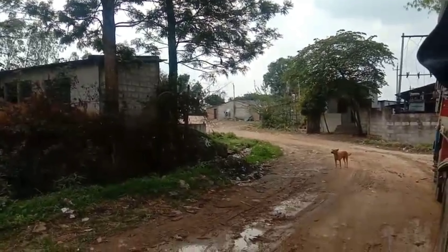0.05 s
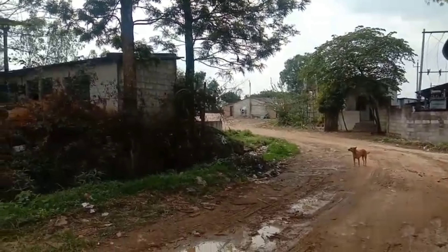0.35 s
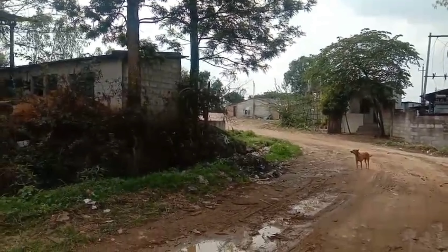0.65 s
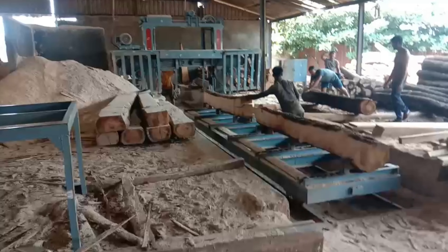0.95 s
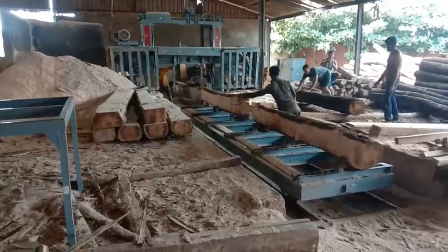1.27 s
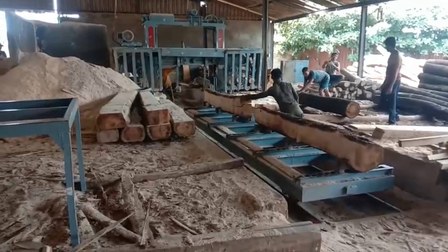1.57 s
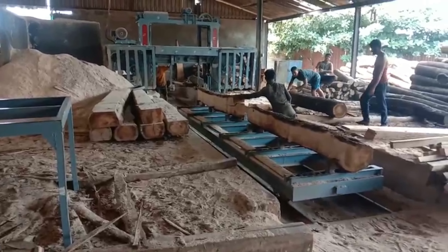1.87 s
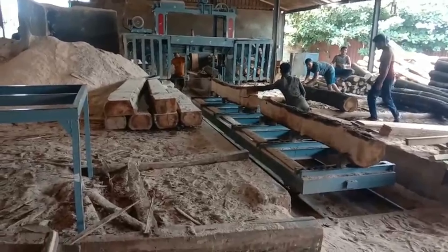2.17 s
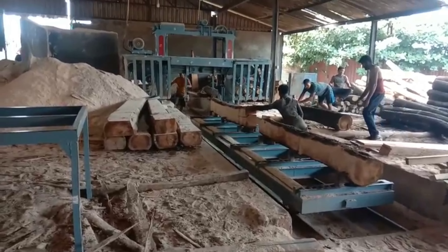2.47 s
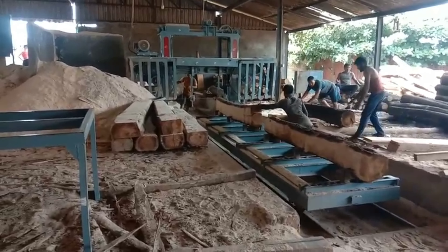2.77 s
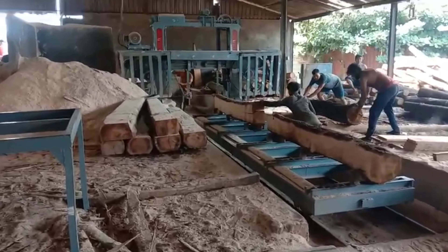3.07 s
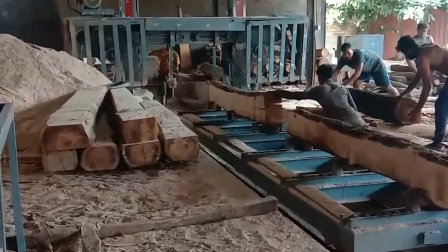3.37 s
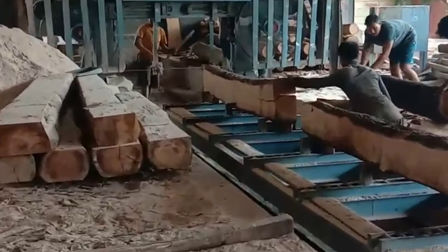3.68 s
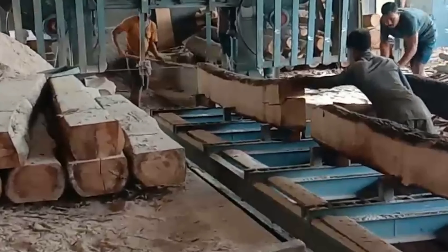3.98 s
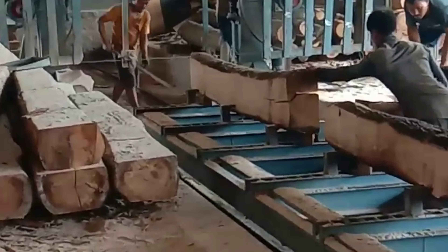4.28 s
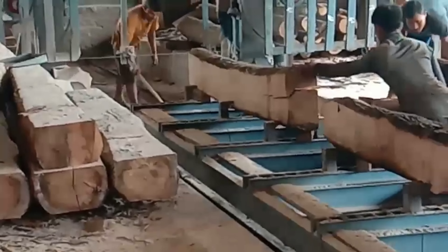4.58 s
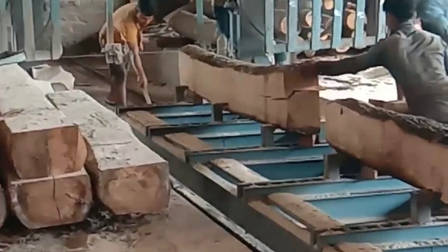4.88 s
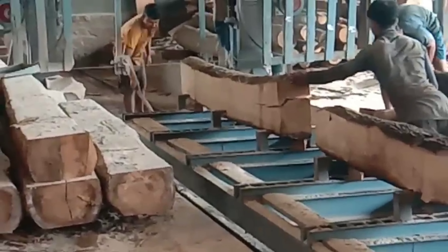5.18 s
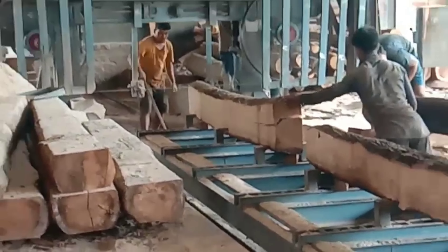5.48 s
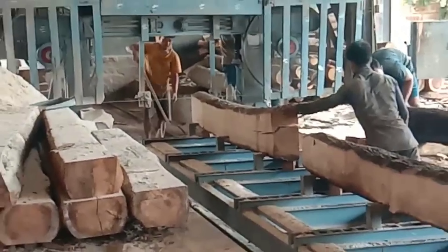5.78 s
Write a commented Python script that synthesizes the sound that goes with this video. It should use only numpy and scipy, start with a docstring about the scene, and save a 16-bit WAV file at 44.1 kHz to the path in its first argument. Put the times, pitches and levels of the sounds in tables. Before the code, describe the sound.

A short whistling blast of air and a clunk outdoors, then a band saw hisses and rings steadily through a log.

```python
"""On a village road a vehicle idles, bumps, vents a whistling jet of air and clunks; then the scene changes.
Under a tin roof a band saw fades in, ripping a log. Its teeth tear the fibres, so the kerf hisses and blade and
frame ring in forced vibration. The band sings between its wheels and chirps by friction in its guides, while
the carriage rumbles, timber knocks and the drive hums."""
import sys
import numpy as np
from scipy import signal
from scipy.fft import rfft, irfft
from scipy.io import wavfile

SR = 44100
rng = np.random.default_rng(int(sys.argv[2]) if len(sys.argv) > 2 else 0)


def waveform_to_disk(signal):
    """Save audio, clipped to [-1, 1], as 16-bit WAV at the path in sys.argv[1]."""
    frames = np.transpose(np.atleast_2d(signal))
    scaled = np.clip(frames, -1, 1) * 32767
    samples = np.round(scaled).astype(np.int16)
    wavfile.write(sys.argv[1], SR, samples)


N = 261954
TIME = np.arange(N) / SR
FREQ = np.fft.rfftfreq(N, 1 / SR)


def saw_teeth():
    """Forced vibration: teeth tearing uneven fibres make the kerf hiss, the frame ring, the log groan."""
    # Broad spectra of the kerf and of blade and frame: frequency_hz, level_db
    kerf_spectrum = [(2500, -33), (4000, -17.5), (5200, -8.5), (6300, -6), (6650, -6.5), (7500, -7),
                     (8000, -15.5), (9500, -21), (12000, -29.5), (13900, -24.5), (14700, -21),
                     (15500, -16.5)]
    frame_spectrum = [(250, -13), (550, -9.5), (850, -7.5), (1080, -1), (1480, -7), (1700, -2.5),
                      (2050, -4), (2650, 0), (3600, -5), (4800, -4), (7000, -12), (9000, -35.5)]
    # Resonances standing on those spectra: centre_hz, width_hz, height_db
    kerf_modes = [(5480, 290, 2.6), (6080, 650, 9.95), (7070, 370, 5.7), (11340, 710, 5.4), (14700, 160, 4)]
    frame_modes = [(1249, 93, 9.5), (2282, 163, 7.7), (3100, 36, 0.7), (3900, 67, 4.9), (4430, 60, 2.7),
                   (4540, 70, 5.7)]
    # Groan of the log as the blade enters: time_s, level_db
    entry_envelope = [(1.0, -29), (1.3, -30), (1.6, -26.5), (1.85, -29), (2.1, -37), (2.4, -42)]
    # Resonances of the log: centre_hz, half_width_hz, level_db
    log_modes = [(171.6, 20, 0), (326, 37, -0.5), (431, 38, -3.5), (790, 260, -2), (1262, 98, 0.5),
                 (2270, 90, -25)]
    bite = gain_of(np.tanh(wander(180)))  # single fibres roughen the sound
    grain_load = np.tanh(wander(14))  # hard and soft grain loads the teeth
    settling_s = [1.83, 2.38]  # deep in the log, the hiss grows and the frame calms
    hiss_db = np.interp(TIME, settling_s, [-21, -18]) + .72 * grain_load
    frame_db = np.interp(TIME, settling_s, [-23.5, -26]) + .92 * grain_load
    kerf = gain_of(hiss_db) * colour(white() * bite, kerf_spectrum, kerf_modes)
    frame = gain_of(frame_db) * colour(white() * bite, frame_spectrum, frame_modes)
    groan = level(entry_envelope) * resonate(white(), log_modes)
    return shed_echoes(kerf, t60_s=.3, wet_db=-16) + shed_echoes(frame + groan, t60_s=.45, wet_db=-11)


def blade_song():
    """Transverse vibration: the free span of the band sings at one pitch, swelling and sinking."""
    # Overall strength of the song: time_s, level_db
    envelope = [(1.3, -48.5), (2.15, -41), (2.35, -48.5), (2.85, -39), (3.0, -51), (3.8, -48), (4.9, -46),
                (5.35, -51), (5.94, -53)]
    swell_hz, crest_s = 3.29, 2.84
    swell_db = 3 * np.cos(2 * np.pi * swell_hz * (TIME - crest_s))
    swell_db += 4 * np.tanh(wander(2 * swell_hz))
    return level(envelope) * gain_of(swell_db) * tone(582.4, stray_hz=4, flutter_db=1, pace_hz=14)


def guide_chirps():
    """Stick-slip friction: the band chirps as it catches and slips in its guides."""
    # Rubs against the guides: centre_s, level_db, pitch_hz, half_length_s
    chirps = [(1.44, -24, 3350, .022), (1.89, -30, 3070, 0.05), (2.09, -28, 3080, .021),
              (2.32, -31, 3350, .025), (2.35, -32, 3160, .03), (2.53, -29.5, 3180, 0.027),
              (2.575, -26, 3380, 0.03), (2.75, -29, 3100, 0.021), (2.98, -30, 3070, 0.067),
              (3.405, -26.5, 3360, 0.037), (4.03, -30, 3290, 0.026), (4.48, -31, 3130, .022),
              (4.65, -33, 3090, .025), (4.855, -27.5, 3350, .022), (5.08, -26.5, 3080, 0.042),
              (5.485, -23.5, 3360, .02)]
    stick_slip = unit_rms(gain_of(3.4 * np.tanh(wander(90))))
    return stick_slip * bursts(chirps, stray_fraction=.009, pace_hz=150)


def carriage():
    """Rolling noise: the carriage runs unevenly, and its jolts modulate a low rumble."""
    # Strength of the rumble: time_s, level_db
    envelope = [(1.3, -43), (1.7, -39), (2.05, -36), (2.5, -39.5), (3.3, -40.5), (4.1, -40), (4.3, -39),
                (5.94, -40.5)]
    # Spectrum of the rumble: frequency_hz, level_db
    spectrum = [(25, -37), (50, -38), (75, -13), (105, 0), (165, 1), (250, -4.5), (340, -3), (440, -7.5),
                (600, -10.5), (1200, -44)]
    jolts = gain_of(2 * wander(11))
    return level(envelope) * jolts * colour(white(), spectrum)


def drive():
    """Rotating machinery: drive and wheels hum in a line spectrum whose higher tones stray further."""
    # Tones of the drive and wheels: pitch_hz, level_db
    tones = [(163, -47.5), (376.8, -52.5), (425.3, -49), (527.6, -58.5), (672.9, -57), (769.8, -56),
             (926, -55.5), (969, -58), (1049, -49.5), (1125, -44.5), (1243, -43.5), (1863, -51),
             (2342, -45), (5530, -35.5)]
    return sum(gain_of(db) * tone(hz, stray_hz=1.5 + .0025 * hz, flutter_db=3, pace_hz=16)
               for hz, db in tones)


def timber():
    """Impact and sliding friction: shifted timber knocks, and a plank scrapes at the carriage."""
    # Knocks of timber: centre_s, level_db, pitch_hz, half_length_s
    knocks = [(1.42, -33, 149.4, .03), (1.8, -34.5, 95, 0.022), (4.27, -33, 158, 0.032),
              (4.37, -31.5, 150, 0.021), (4.86, -33, 162, .03), (5.71, -35, 146.4, 0.022),
              (5.84, -36, 135, .027)]
    # Strength of the scrape: time_s, level_db
    scrape_envelope = [(5.82, -51), (5.845, -30), (5.88, -23.5), (5.94, -38)]
    # Resonances of the plank: centre_hz, half_width_hz, level_db
    plank_modes = [(239, 79, -2), (945, 240, -2), (1440, 200, 7), (1840, 260, 6.5), (2780, 180, 3)]
    knocking = bursts(knocks, stray_fraction=.15, pace_hz=58.8)
    return knocking + level(scrape_envelope) * resonate(white(), plank_modes)


def air_valve():
    """Flow-excited resonance: a jet of compressed air drives the valve's modes until they whistle."""
    # Strength of the flow and of the whistling: time_s, level_db
    flow_envelope = [(.74, -70), (.768, -41), (.785, -29), (.803, -25), (.812, -19), (.825, -24.5),
                     (.85, -23), (.93, -23), (.98, -22.5)]
    whistle_envelope = [(.76, -40), (.80, -6), (.835, -6), (.85, 0), (.915, 1), (.94, -3), (.98, -6)]
    # Spectrum of the jet: frequency_hz, level_db
    jet_spectrum = [(150, -36), (500, -16), (800, -7.5), (1400, -12), (1900, -7.5), (3700, -11),
                    (4900, -4.5), (6200, -0.5), (6600, -3), (7400, -4), (8500, -14.5), (11000, -23.5),
                    (13700, -29), (15200, -21)]
    # Whistling modes of the valve: pitch_hz, level_db
    valve_tones = [(3240, -42), (4285, -31), (4926, -33), (5373, -38), (5582, -30.5), (6035, -37),
                   (6234, -29.5), (6724, -38), (6864, -33.5), (7472, -39)]
    cavity_modes = [(hz, 110, 6) for hz, _ in valve_tones]
    jet = level(flow_envelope) * colour(white(), jet_spectrum, cavity_modes)
    whistles = sum(gain_of(db) * tone(hz, stray_hz=13, flutter_db=3, pace_hz=70)
                   for hz, db in valve_tones)
    return jet + level(whistle_envelope) * whistles


def panel_clunk():
    """Modal response: a brief force sounds the resonances of a panel as a clunk."""
    # Force on the panel: time_s, level_db
    force_envelope = [(.93, -67), (.943, -30), (.952, -19.5), (.962, -21.5), (.968, -18.5), (.98, -32)]
    # Resonances of the panel: centre_hz, half_width_hz, level_db
    panel_modes = [(335, 35, -8.5), (730, 200, 1.5), (1245, 96, 3), (1800, 140, -4)]
    return level(force_envelope) * resonate(white(), panel_modes)


def roadside():
    """Superposition: broadband outdoor noise, the faint tones of an idling vehicle and its soft bumps."""
    # Spectrum of the outdoor wash: frequency_hz, level_db
    wash_spectrum = [(25, -34), (70, -14), (130, -3.5), (230, -14.5), (700, -9.5), (1200, -8),
                     (1550, -14.5), (2700, -6), (3600, -14.5), (5100, -15), (5900, -9), (7300, -12.5),
                     (9000, -31.5), (13000, -44)]
    # Peaks and a dip in the wash: centre_hz, width_hz, height_db
    wash_peaks = [(1260, 100, 5), (2190, 160, 5), (2770, 540, 7), (6620, 260, -6)]
    # Steady tones of the idle: pitch_hz, level_db
    idle_tones = [(355.3, -52.5), (1249, -53.5), (2826, -52)]
    # Bumps of the bodywork: centre_s, level_db, pitch_hz, half_length_s
    bumps = [(.345, -34, 119.6, 0.0086), (.409, -29, 125, 0.0044), (.432, -19.5, 85.4, 0.0061),
             (.468, -38, 79.3, .014)]
    wash = gain_of(-35.5) * colour(white(), wash_spectrum, wash_peaks) * gain_of(.5 * wander(25))
    idle = sum(gain_of(db) * tone(hz, stray_hz=5, flutter_db=2.5, pace_hz=18) for hz, db in idle_tones)
    return wash + idle + bursts(bumps, stray_fraction=.078, pace_hz=40)


def shed_echoes(x, t60_s, wet_db):
    """Reverberation: reflections scattered by the roof and timber stacks decay exponentially."""
    delay_s, echoes_per_s = TIME[:SR // 2], 2000
    strengths = rng.standard_normal(len(delay_s))
    arrivals = (rng.random(len(delay_s)) < echoes_per_s / SR) * (delay_s > .004)
    taps = strengths * arrivals * gain_of(-60 * delay_s / t60_s)
    echoes = signal.fftconvolve(x, taps / np.linalg.norm(taps))[:N]
    return (x + gain_of(wet_db) * echoes) / np.hypot(1, gain_of(wet_db))


def colour(x, spectrum, peaks=()):
    """Spectral shaping: filters x by a broad curve with bell-shaped peaks or dips, to rms 1."""
    hz, db = np.transpose(spectrum)
    shape_db = np.interp(np.log(FREQ + 1), np.log(hz), db)
    for centre_hz, width_hz, height_db in peaks:
        shape_db += height_db * 2 ** -((2 * (FREQ - centre_hz) / width_hz) ** 2)
    return unit_rms(irfft(rfft(x) * gain_of(shape_db), N))


def resonate(x, modes):
    """Modal summation: x passes through steep resonances, each with its own share of the power."""
    spectrum, response = rfft(x), np.zeros(N)
    for hz, half_width_hz, db in modes:
        mode = irfft(spectrum / (1 + 1j * (FREQ - hz) / half_width_hz) ** 2, N)
        response += gain_of(db) * unit_rms(mode)
    return unit_rms(response)


def tone(hz, stray_hz, flutter_db, pace_hz):
    """Random modulation: a sine of rms 1 whose pitch wavers and whose amplitude flutters."""
    cycles = np.cumsum(hz + stray_hz * wander(pace_hz)) / SR + rng.random()
    flutter = gain_of(flutter_db * np.tanh(wander(pace_hz)))
    return unit_rms(np.sin(2 * np.pi * cycles) * flutter)


def bursts(rows, stray_fraction, pace_hz):
    """Wave packets: short tones of unsteady pitch under Gaussian envelopes."""
    warped_time = np.cumsum(1 + stray_fraction * wander(pace_hz)) / SR
    packets = np.zeros(N)
    for (centre_s, db, hz, half_length_s), phase in zip(rows, rng.random(len(rows))):
        near = abs(TIME - centre_s) < np.pi * half_length_s
        envelope = gain_of(db) * np.exp(-((TIME[near] - centre_s) / half_length_s) ** 2)
        packets[near] += envelope * np.sin(2 * np.pi * (hz * warped_time[near] + phase))
    return packets


def wander(pace_hz):
    """Low-pass noise: a drift of rms 1, no faster than about pace_hz."""
    return unit_rms(irfft(rfft(white()) / (1 + (FREQ / pace_hz) ** 4), N))


def white():
    """White noise: equal power per hertz."""
    return rng.standard_normal(N)


def level(rows):
    """Amplitude envelope: a gain for every sample from rows of time_s, level_db."""
    return gain_of(np.interp(TIME, *np.transpose(rows)))


def gain_of(db):
    """Decibels to amplitude ratio."""
    return 10 ** (np.asarray(db) / 20)


def unit_rms(x):
    """Power normalisation to rms 1."""
    return x / np.sqrt(np.mean(x ** 2) + 1e-20)


def scene():
    """Sources add linearly: the road scene ends abruptly, the scene changes and the mill fades in, alike in
    both channels."""
    road_end_s, fade_start_s, fade_full_s = .9795, 1.018, 1.29
    road = (roadside() + air_valve() + panel_clunk()) * (TIME < road_end_s)
    mill = saw_teeth() + blade_song() + guide_chirps() + carriage() + drive() + timber()
    fade = np.clip((TIME - fade_start_s) / (fade_full_s - fade_start_s), 0, 1) ** .93
    return np.tile(road + fade * mill, (2, 1))


def record(dry):
    """Band limiting: the microphone loses the deepest bass, and a steep low-pass cuts the top treble."""
    low_edge_hz, high_edge_hz = 50, 15520
    highpass = signal.butter(3, low_edge_hz, "highpass", fs=SR, output="sos")
    lowpass = signal.firwin(1023, high_edge_hz, window=("kaiser", 9), fs=SR)
    return signal.oaconvolve(signal.sosfilt(highpass, dry), lowpass[None], "same")


dry = scene()
out = record(dry)
waveform_to_disk(out)
```